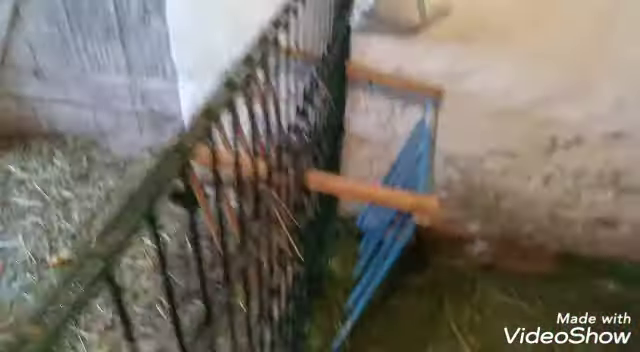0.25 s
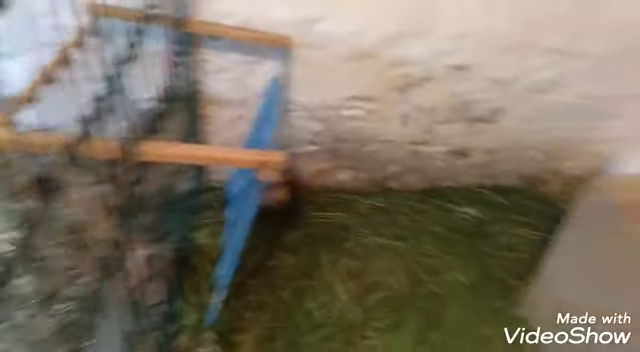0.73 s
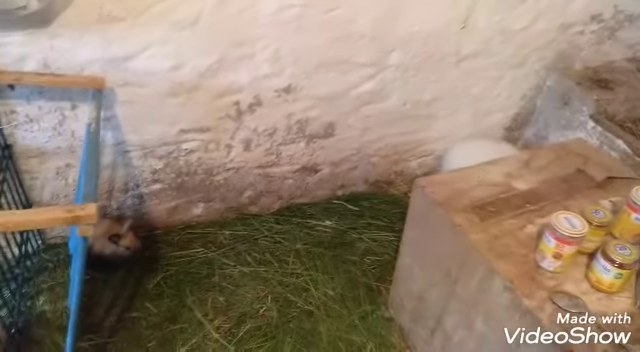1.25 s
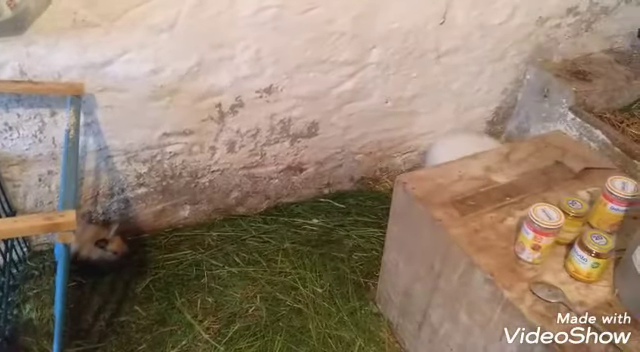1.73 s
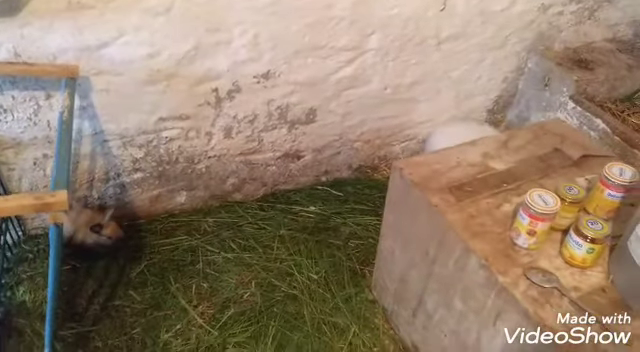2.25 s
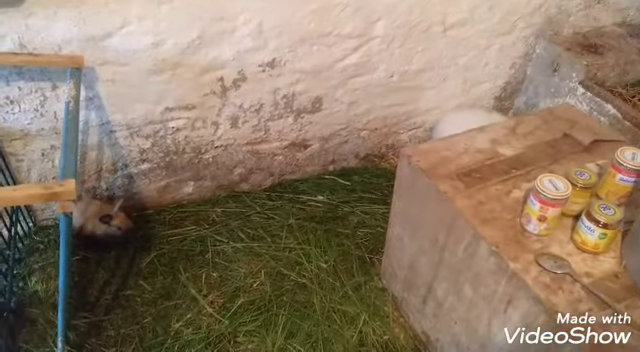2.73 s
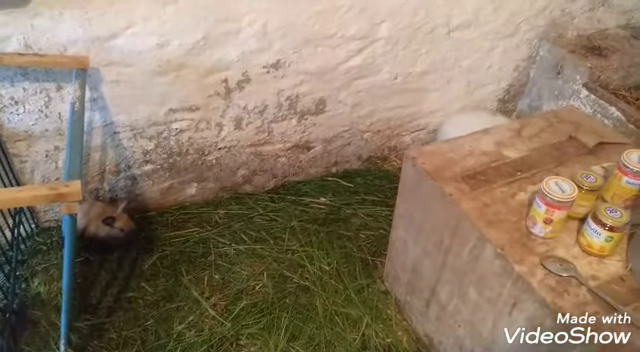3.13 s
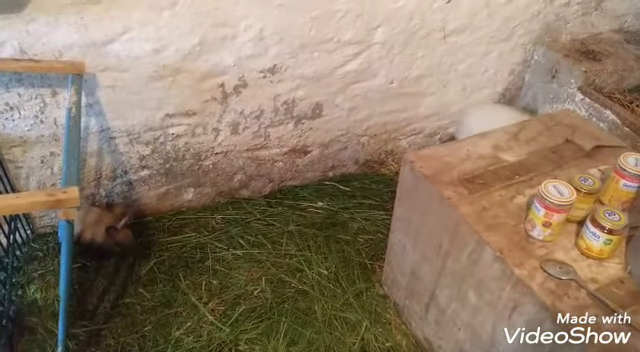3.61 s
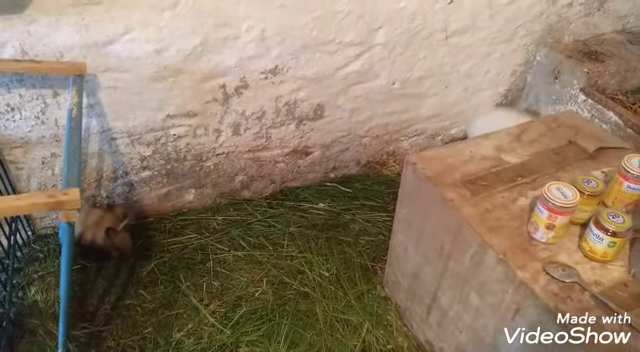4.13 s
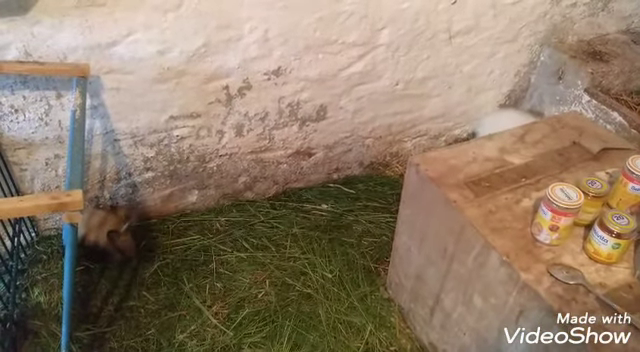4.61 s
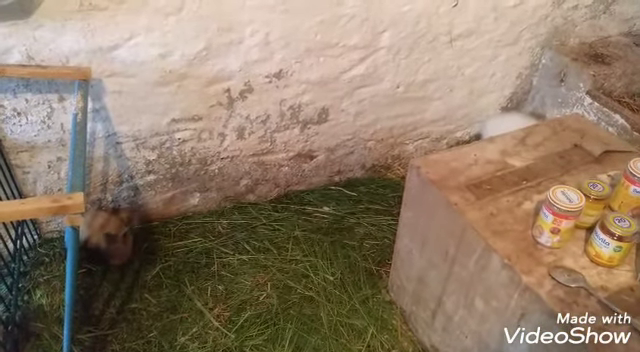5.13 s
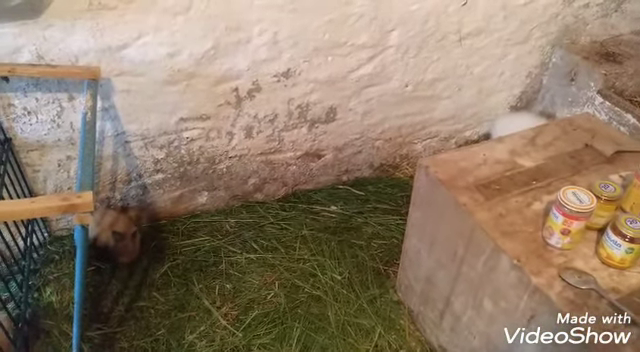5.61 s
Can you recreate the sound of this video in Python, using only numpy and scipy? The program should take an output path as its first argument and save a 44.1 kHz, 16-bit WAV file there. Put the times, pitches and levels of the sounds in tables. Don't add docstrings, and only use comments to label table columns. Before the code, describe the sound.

Quick repeated guinea-pig-like squeaks, each sliding up then breaking lower, edged with piercing whistle and soft snuffling air, close in a ringing barn.

```python
import sys
import numpy as np
from scipy import signal
from scipy.fft import rfft, irfft
from scipy.io import wavfile
from scipy.ndimage import uniform_filter1d

SR = 44100
rng = np.random.default_rng(int(sys.argv[2]) if len(sys.argv) > 2 else 0)


def wrap_up_sound(samples):
    columns = np.atleast_2d(samples).T
    tamed = np.clip(columns, -1, 1)
    steps = np.round(tamed * 32767).astype(np.int16)
    wavfile.write(sys.argv[1], SR, steps)


def ratio_of_db(decibels):
    return 10 ** (np.asarray(decibels, float) / 20)


N = 258411

# (frequency [Hz], level [dB])
TILT = [(60, -5), (99, -1), (160, -1.0), (270, -2), (450, 1.5), (740, -2), (1220, 2), (2010, 3),
        (3330, 0.5), (5500, -3.5), (9080, -8), (15000, -12)]


def animal():
    # (time [s], pitch [Hz], level [dB])
    long_whistles = [
        [(0.13, 5663, -86), (0.152, 5806, -54), (0.192, 5816, -41), (0.242, 5559, -38), (0.274, 5654, -37),
         (0.36, 5505, -47), (0.4, 5530, -40), (0.466, 5599, -56), (0.5, 5505, -70)],
        [(0.57, 5526, -76), (0.588, 5741, -48), (0.646, 5659, -41), (0.73, 5545, -47), (0.792, 5799, -39),
         (0.848, 5731, -63), (0.856, 5810, -53), (0.9, 5791, -75)],
    ]
    voice, nose, beat = np.zeros(N), np.zeros(N), np.zeros(N, complex)
    shake, flutter = wobble(0.0063), wobble(0.0019)
    for s, *row in notes():
        sound, flow = fold_note(*row, np.roll(shake, -round(s * SR)))
        add(voice, s, sound)
        add(beat, s, flow)
    beat = beat / np.maximum(abs(beat), 1)

    for s, length_s, start_hz, end_hz, db in short_whistles():
        hz = np.linspace(start_hz, end_hz, round(length_s * SR))
        add(nose, s, whistle(s, hz, db, shake, flutter, beat, octave_db=-11))
    for rows in long_whistles:
        s, pitch_hz, level_db = np.transpose(rows)
        t = np.arange(s[0], s[-1], 1 / SR)
        hz, db = np.interp(t, s, pitch_hz), np.interp(t, s, level_db) - 0.5
        add(nose, s[0], whistle(s[0], hz, db, 0.5 * shake, flutter, 0.05 * beat, octave_db=-16.0))
    return voice, nose, abs(beat)


def notes():
    # (time [s], length [s], top pitch [Hz], level [dB], overtones [dB])
    whines = [(-.03, 0.044, 573, -56, -8), (.184, 0.08, 811.2, -29, -12), (.26, 0.0364, 814, -38, -32),
              (.676, 0.079, 768, -66.5, -18), (1.011, 0.02, 536, -31.5, -5),
              (1.283, 0.06, 496.7, -40.5, -0.5), (1.603, 0.057, 497.6, -40, 1.5),
              (1.943, 0.048, 578.5, -35, -3.5), (2.307, 0.048, 577.3, -33.5, -2.5),
              (2.642, 0.062, 823.6, -32.5, 2.5), (2.698, 0.04, 814, -26.5, -18.5),
              (2.854, 0.018, 680, -36.5, -5.5), (3.182, 0.021, 324, -50.5, 2.5),
              (3.467, 0.051, 530.4, -38.5, -1.5), (3.812, .031, 408, -47, 5), (4.131, .056, 629.6, -38, -2),
              (4.449, 0.06, 476.2, -41.5, -1), (4.795, 0.043, 532.7, -39, -1.5),
              (5.111, 0.068, 514.7, -42, 1.2), (5.469, 0.068, 705.7, -41, 6)]
    # (time [s], length [s], end pitch [Hz], level [dB], overtones [dB])
    falls = [(1.033, 0.023, 391, -44, -3), (1.342, 0.024, 402, -41.5, -0.5), (1.66, 0.025, 400, -46.5, 0.5),
             (2, 0.019, 416, -44, -2.5), (2.359, .018, 419.5, -40, -1), (2.712, 0.021, 584, -41.5, -18),
             (2.872, 0.012, 441, -51, -2), (3.121, 0.042, 338, -53.5, 4),
             (3.517, 0.041, 413.5, -41.5, -0.5), (3.855, 0.023, 304.6, -49.5, 4.5),
             (4.184, 0.013, 447, -37, -26), (4.492, 0.03, 385, -46, 4.5), (4.839, 0.022, 398.3, -43, 2.3),
             (5.166, 0.031, 411, -41.5, -2.2), (5.545, 0.027, 513.4, -39, -13)]
    slide_per_s, slide_after_s, slide_most = 3.3, 0.02214, 0.11
    rows = []
    for s, length_s, top_hz, *db in whines:
        slide = np.clip(slide_per_s * (length_s - slide_after_s), 0, slide_most)
        rows.append((s, length_s, top_hz * (1 - slide), top_hz, *db))
    for s, length_s, end_hz, *db in falls:
        rows.append((s, length_s, end_hz * 1.04, end_hz, *db))
    return rows


def fold_note(length_s, start_hz, end_hz, db, overtones_db, shake):
    # (frequency [Hz], level [dB])
    throat = [(300, 10), (900, -7.5), (1250, -15), (1550, -14.5), (2050, -11.5), (2500, -12), (3000, -26),
              (3700, -44), (5000, -22.5), (8000, -25), (11500, -49), (15000, -55)]
    t = np.arange(0, length_s, 1 / SR)
    u = t / length_s
    breaks = end_hz < start_hz
    hz = end_hz + (start_hz - end_hz) * np.exp(-t / 0.01972)
    hz = hz * (1 + 0.0006 * shake[:len(t)])
    hz = hz * (1 + 0.15 * breaks * np.exp(-t / 0.0041))
    turns = 2 * np.pi * np.cumsum(hz) / SR

    over = ratio_of_db(-19.5) * np.cos(2 * turns + 4)
    for k in range(2, int(15000 / end_hz)):
        over = over + ratio_of_db(read(throat, k * hz)) * np.cos(k * turns + k * k)

    effort_db = -7.0 * (u if breaks else 1 - u)
    attack_s, release_s = (0.004 if breaks else 0.012), 0.0091
    swell = np.minimum(t / attack_s, 1) * np.minimum((length_s - t) / release_s, 1)
    gain = np.sqrt(2) * ratio_of_db(db + 1.0 + effort_db) * swell
    voice = gain * (np.cos(turns) + ratio_of_db(overtones_db) * over)
    flow = np.clip((db + 58) / 8, 0, 1) * swell * np.exp(1j * turns)
    return voice, flow


def short_whistles():
    # (voice onset [s], lead-in level [dB], sag length [s], sag depth [Hz], sag level [dB])
    sniffs = [(0.999, -56, 0.05, 154, -48), (1.28, -61, 0.07, 178, -46), (1.593, -55, 0.096, 145, -48),
              (1.94, -55, 0.094, 232, -51.5), (2.3, -57, 0.073, 120, -48), (2.641, -50, 0.099, 487, -49.5),
              (3.078, -61, 0.066, 284, -56.5), (3.462, -68, 0.077, 229, -50),
              (3.806, -61, 0.04, 161, -52.5), (4.123, -70, 0.0864, 300, -49),
              (4.457, -60, 0.062, 80.6, -53), (4.789, -65, 0.055, 120, -50),
              (5.111, -61.5, 0.075, 140, -50), (5.47, -46.5, 0.091, 413, -47.5), (5.88, -57, .05, 50, -60)]
    # (time [s], length [s], pitch [Hz], level [dB])
    peeps = [(-.02, 0.048, 5690, -57), (2.001, 0.046, 6260, -48), (2.368, 0.023, 6540, -47.5),
             (2.715, 0.052, 5820, -43.5), (2.742, 0.079, 5873, -44.5), (2.858, 0.026, 5980, -49),
             (3.153, 0.054, 6410, -61), (3.53, 0.046, 6520, -47), (3.87, 0.027, 6870, -56.5),
             (4.197, 0.043, 6170, -57), (4.518, 0.02, 6550, -48.5), (4.834, 0.075, 6400, -54.5),
             (5.177, 0.079, 6526, -52), (5.556, 0.12, 6150, -50.5)]
    lead_s, lead_length_s, lead_hz, lead_rise_hz = 0.034, 0.055, 6230, 120
    sag_hz, peep_sag_hz_per_s = 6086, 380
    rows = []  # (time s, length s, start Hz, end Hz, dB)
    for s, lead_db, sag_length_s, drop_hz, sag_db in sniffs:
        rows.append((s - lead_s, lead_length_s, lead_hz, lead_hz + lead_rise_hz, lead_db))
        rows.append((s, sag_length_s, sag_hz, sag_hz - drop_hz, sag_db))
    for s, length_s, hz, db in peeps:
        half_hz = peep_sag_hz_per_s * length_s / 2
        rows.append((s, length_s, hz + half_hz, hz - half_hz, db))
    return rows


def whistle(s, hz, db, shake, flutter, beat, octave_db):
    shake, flutter, beat = (np.roll(v, -round(s * SR))[:len(hz)] for v in (shake, flutter, beat))
    shaken_hz = hz * (1 + 0.0038 * (1 - 0.75 * abs(beat)) * shake)
    turns = 2 * np.pi * np.cumsum(shaken_hz) / SR + 1.6 * beat.imag
    chop_db = 0.6 * beat.real - 2.5 * (beat ** 2).real
    tone = np.cos(turns) + ratio_of_db(octave_db) * np.cos(2 * turns)
    gain = np.sqrt(2) * ratio_of_db(db + 1.67 * flutter + chop_db)
    return gain * tone * signal.windows.tukey(len(hz), 0.45)


def air(voiced):
    # (time [s], hiss level [dB], rush lag [s], rush level [dB], thump level [dB])
    breaths = [(0.202, -48, 0.04, -61, -67), (0.648, -53, 0.013, -66, -61), (1.028, -51, 0.038, -50.5, -45),
               (1.318, -50.5, 0.047, -52, -44.5), (1.612, -56.5, 0.082, -52.5, -44.5),
               (1.962, -48.5, 0.11, -56.5, -56), (2.328, -50, 0.07, -55.5, -45.5),
               (2.67, -45.5, 0.074, -56, -50), (3.148, -58, 0.027, -54.5, -47),
               (3.492, -50, 0.07, -58.5, -53.5), (3.849, -64, 0.035, -56.5, -47),
               (4.142, -53.5, 0.084, -54, -48), (4.48, -57, 0.056, -55, -47.5),
               (4.812, -56, 0.068, -56, -47.5), (5.139, -51.5, 0.09, -55.5, -50),
               (5.492, -46.5, 0.044, -56, -58)]
    # (time [s], hiss level [dB], rush level [dB], thump level [dB])
    straw = [(0.0, -66.5, -73, -71), (.13, -92, -94, -56), (.34, -56.5, -85, -59), (0.472, -59, -65.5, -57),
             (.72, -57, -71, -74), (0.818, -60.5, -62.5, -57), (.93, -64.5, -94, -78),
             (1.13, -87, -70, -54), (1.82, -87, -72, -53.5), (2.84, -56, -78, -55), (2.97, -60, -69, -62.5),
             (3.728, -58, -76, -66), (3.8, -64, -64.5, -79), (4.47, -57, -67.5, -52.5),
             (5.61, -57.5, -78, -70), (5.7, -72, -66.5, -59.5), (5.79, -66.5, -75.5, -61)]
    # (frequency [Hz], level [dB])
    rush_colour = [(200, 1.5), (500, 6), (1000, 10.5), (1500, 10), (2400, 7.5), (3200, 0), (4200, -8.5),
                   (5500, -105.5)]
    # (frequency [Hz], level [dB])
    hiss_colour = [(1400, -18), (2050, 1), (2550, 5.5), (3100, -9), (3800, -5.5), (4700, -3), (5500, -7.5),
                   (6400, 1.5), (7200, -3), (9500, -3.5), (12500, -7), (15500, -14.5)]
    # (frequency [Hz], level [dB])
    thump_colour = [(25, -55), (45, -9), (65, -0.5), (78, -7.5), (88, 7), (100, -4), (160, -10), (260, -11),
                    (400, -39.5)]
    # (frequency [Hz], level [dB])
    floor_colour = [(18, -56), (30, -8), (85, -4), (351, -13), (533, -14), (1780, -22), (2500, -21),
                    (3600, -33.5), (6400, -26), (12300, -38), (15600, -43)]
    thump_lag_s, voiced_rush_db, hiss_choke = 0.029, -10.5, 0.7
    s, hiss_db, lag_s, rush_db, thump_db = np.transpose(breaths)
    stirs = np.array(straw)
    early_rushes = np.c_[s, rush_db + voiced_rush_db]
    rushes = np.r_[np.c_[s + lag_s, rush_db], early_rushes, stirs[:, ::2]]
    hisses = np.r_[np.c_[s, hiss_db], stirs[:, :2]]
    thumps = np.r_[np.c_[s + lag_s + thump_lag_s, thump_db], stirs[:, ::3]]

    rush = swells(rushes, rise_db_per_s=261, hold_s=0.0454, fall_db_per_s=171, rest_db=-89)
    rush = rush * ratio_of_db(1.35 * wobble(0.00039) + 8.0) * noise(rush_colour, 3.1)
    hiss = swells(hisses, rise_db_per_s=412, hold_s=-0.05, fall_db_per_s=110, rest_db=-110.5)
    hiss = hiss * (1 - hiss_choke * voiced) * ratio_of_db(7.5) * noise(hiss_colour, 2.8)
    thump = swells(thumps, rise_db_per_s=213, hold_s=-0.024, fall_db_per_s=121, rest_db=-69.5)
    thump = thump * ratio_of_db(0.57 * wobble(0.0067)) * noise(thump_colour, 3.7, size=4096)
    still_barn = ratio_of_db(-62.0) * noise(floor_colour, 1.0, size=2048)
    return rush + hiss + thump + still_barn


def barn(x):
    # (frequency [Hz], t60 [s])
    ring = [(300, 0.75), (800, 0.43), (1600, 0.36), (3000, 0.13), (6000, 0.25), (12000, 0.088)]
    first, spacing = 260, 20
    taps = np.zeros((2, SR))
    at = np.arange(first, SR - spacing, spacing)
    at = at + rng.integers(0, spacing, (2, (SR - first - 1) // spacing))
    np.put_along_axis(taps, at, rng.choice([-1., 1.], at.shape), 1)
    taps[1] = 0.3 * taps[0] + taps[1]
    hz, t, z = signal.stft(taps, SR, nperseg=256)
    decay = ratio_of_db(-60 * t / read(ring, hz)[:, None])
    tail = signal.istft(z * decay, SR, nperseg=256)[1]
    tail = tail / np.linalg.norm(tail, axis=1)[:, None]
    return signal.fftconvolve(x, tail[None], axes=-1)[..., :N]


def noise(spectrum, patchy_db, size=512):
    # (frequency [Hz], correlation [0-1])
    likeness = [(30, .5), (80, .9), (300, .8), (700, .5), (2000, .4), (6000, .3), (15000, .1)]
    frames, hz = 4 * N // size + 5, np.fft.rfftfreq(size, 1 / SR)
    a, b, c, d, patches = rng.standard_normal((frames, len(hz), 5)).T
    patches = evened(uniform_filter1d(uniform_filter1d(patches, 6, 0), 10, 1))
    same = np.clip(read(likeness, hz), 0, 1)[:, None]
    left, other = a + 1j * b, c + 1j * d
    z = np.array([left, same * left + np.sqrt(1 - same ** 2) * other])
    z = z * ratio_of_db(read(spectrum, hz)[:, None] + patchy_db * patches)
    return evened(signal.istft(z, nperseg=size, noverlap=size - size // 4)[1][:, :N])


def swells(peaks, rise_db_per_s, hold_s, fall_db_per_s, rest_db):
    t = np.arange(0, N + 64, 64) / SR
    s, db = np.transpose(peaks)[:, :, None]
    rise_db = rise_db_per_s * np.maximum(s - t, 0)
    fall_db = fall_db_per_s * np.maximum(t - s - hold_s, 0)
    power = (ratio_of_db(db - rise_db - fall_db) ** 2).sum(0) + ratio_of_db(rest_db) ** 2
    return np.interp(np.arange(N) / SR, t, np.sqrt(power))


def wobble(smooth_s):
    size = max(int(smooth_s * SR), 2)
    return evened(uniform_filter1d(uniform_filter1d(rng.standard_normal(N), size), size))


def evened(x):
    return x / np.sqrt(np.mean(x ** 2) + 1e-20)


def read(points, hz):
    f, value = np.transpose(points)
    return np.interp(np.log(hz + 1), np.log(f + 1), value)


def add(mix, s, sound):
    at = round(s * SR)
    sound = sound[max(-at, 0):]
    part = mix[max(at, 0):][:len(sound)]
    part += sound[:len(part)]


def scene():
    voice, nose, voiced = animal()
    voice_walls, nose_walls = barn(np.array([voice, nose])[:, None])
    direct = ratio_of_db(2.5) * voice + ratio_of_db(2.5) * nose
    walls = ratio_of_db(2.0) * voice_walls + ratio_of_db(-2.0) * nose_walls
    return direct + walls + air(voiced)


def top_cut(x):
    return signal.sosfilt(signal.butter(12, 15730, fs=SR, output="sos"), x)


def record(dry):
    # (frequency [Hz], phase [rad])
    left_phase = [(60, 0.03), (300, -.5), (700, -1.03), (1400, -2.5), (2500, -4.5), (5600, -7.5),
                  (9000, -11.5), (15000, -17.5)]
    hz = np.fft.rfftfreq(N, 1 / SR)
    half_tilt_db = read(TILT, hz) / 2
    left = ratio_of_db(half_tilt_db) * np.exp(1j * read(left_phase, hz))
    right = ratio_of_db(-half_tilt_db)
    band = hz ** 2 / (hz ** 2 + 35 ** 2) * (hz < 15740)
    ports = irfft(rfft(dry) * band * np.array([left, right]), N)
    return top_cut(ports)


dry = scene()
out = record(dry)
wrap_up_sound(out)
```